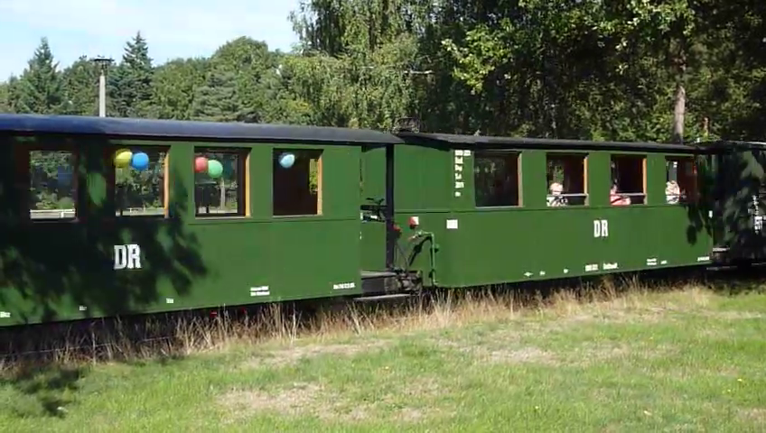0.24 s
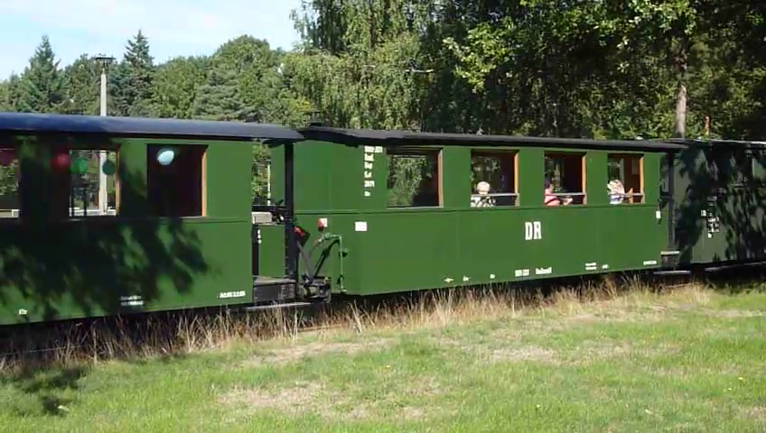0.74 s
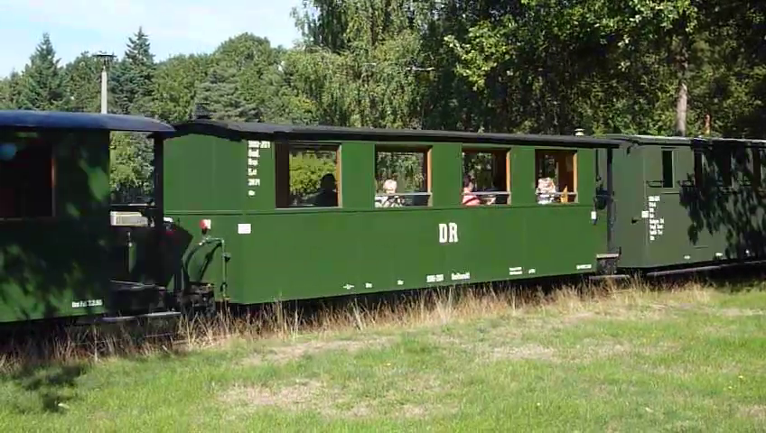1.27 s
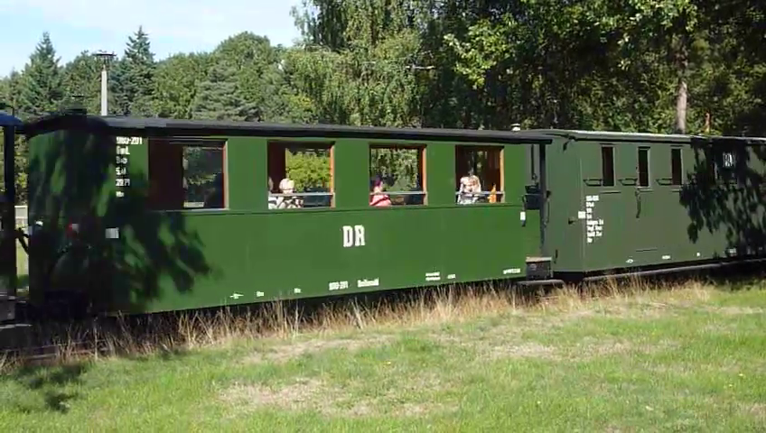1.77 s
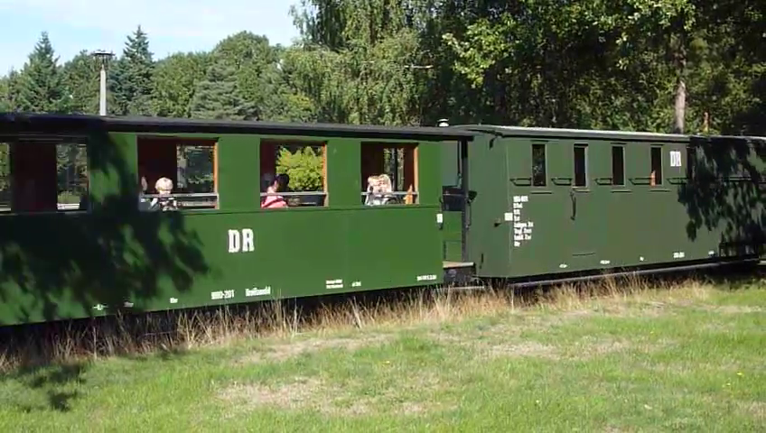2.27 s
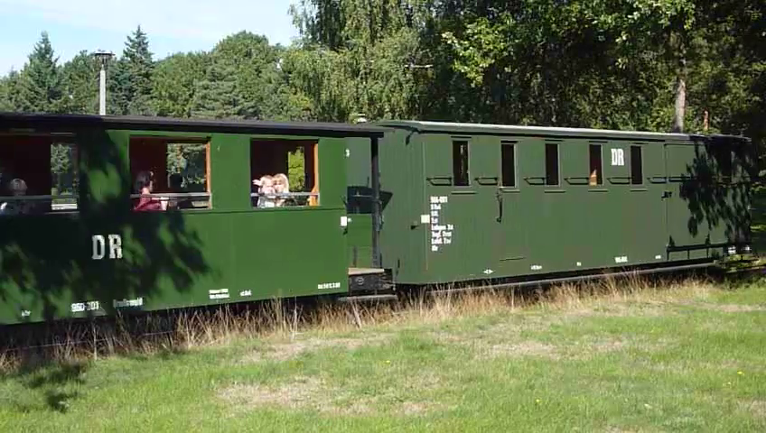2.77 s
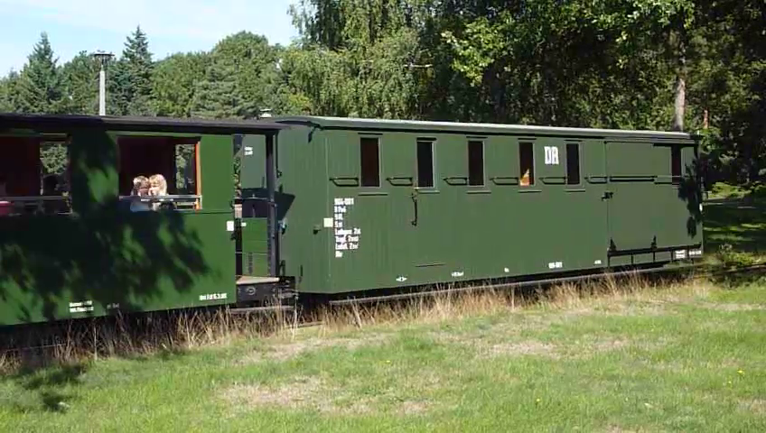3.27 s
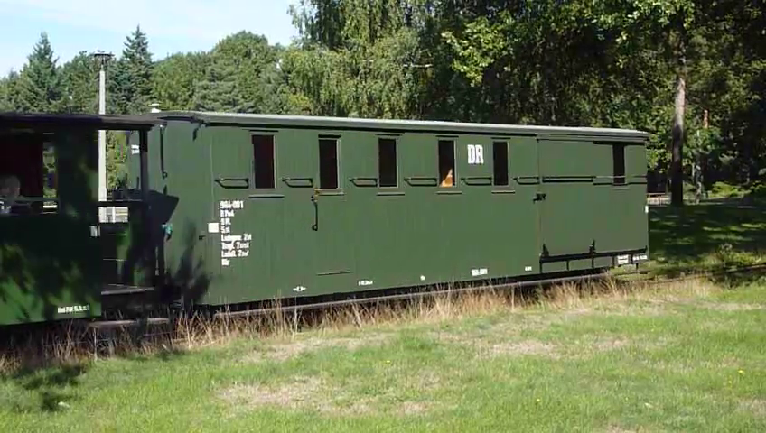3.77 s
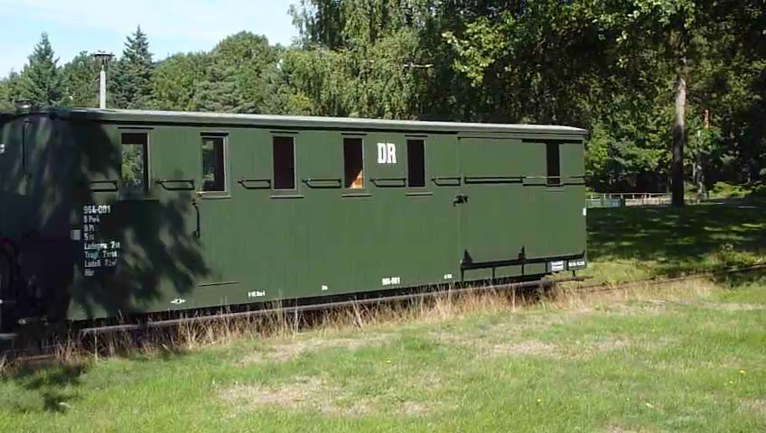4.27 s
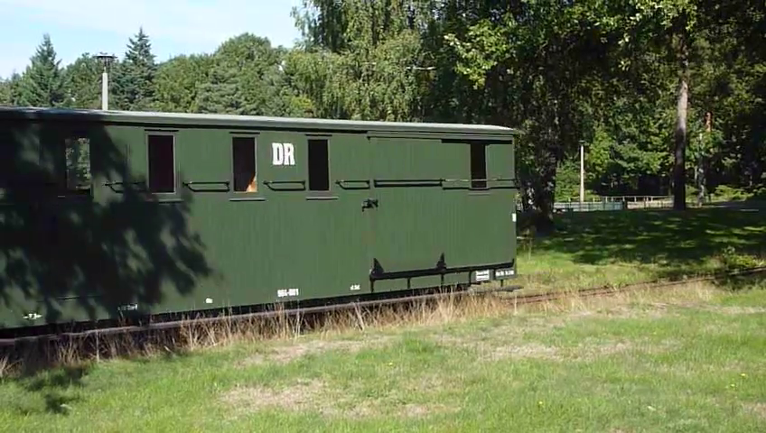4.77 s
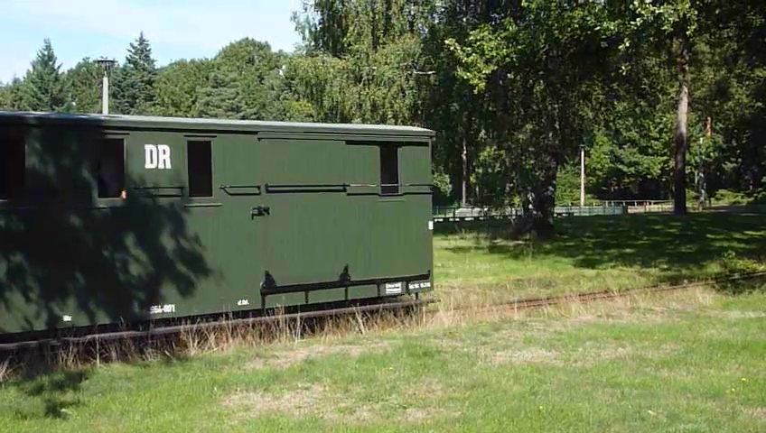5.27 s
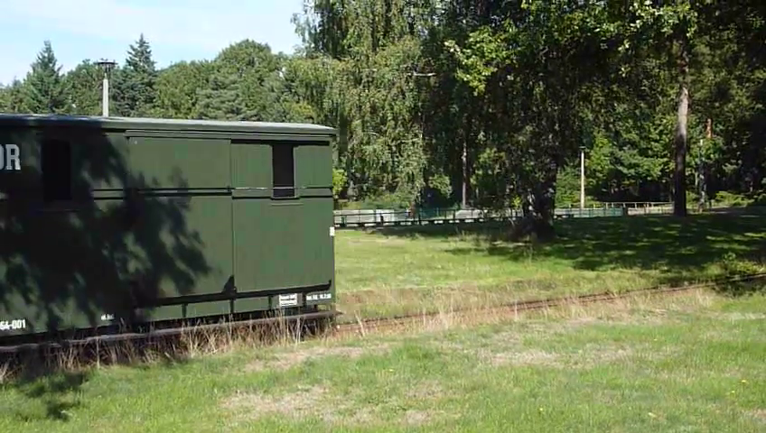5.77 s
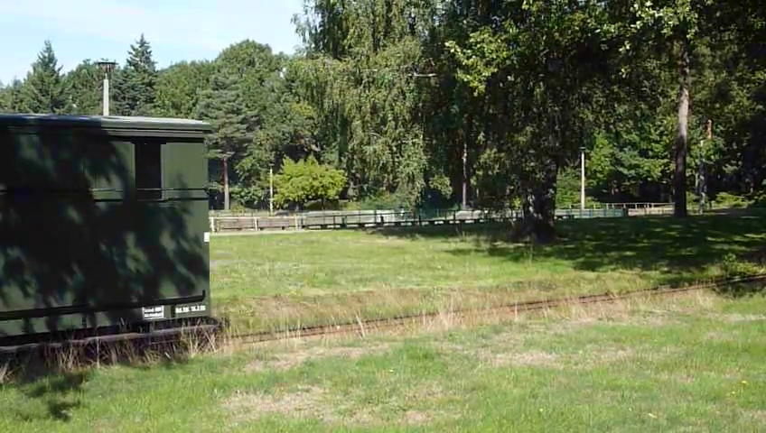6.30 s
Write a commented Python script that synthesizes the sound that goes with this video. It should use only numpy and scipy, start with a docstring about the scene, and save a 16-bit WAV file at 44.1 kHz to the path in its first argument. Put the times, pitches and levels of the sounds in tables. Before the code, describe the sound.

Coaches rumble by in a park while a long, steady horn blast sounds from the left, then stops, leaving rolling noise and sharp wheel clacks.

```python
"""Park train with horn

A small diesel train rolls through a park: coaches close by, locomotive off to the left.
The horn is a pipe blown by engine exhaust: one long, nearly pure note, fluttering with the firing.
Coloured noise rolls and hisses; damped modes ring joints, bogies and rattles; trees echo the horn."""
import sys
import numpy as np
from scipy import signal
from scipy.fft import rfft, irfft, next_fast_len
from scipy.io import wavfile
from scipy.ndimage import map_coordinates

SR = 44100
rng = np.random.default_rng(int(sys.argv[2]) if len(sys.argv) > 2 else 0)


def put_to_file(sound):
    """Save the sound as 16-bit audio at rate SR, in the file named by the first command-line argument."""
    columns = np.atleast_2d(sound).T  # one column per channel
    safe = np.clip(columns, -1, 1)
    whole_steps = np.round(safe * 32767)
    wavfile.write(sys.argv[1], SR, whole_steps.astype(np.int16))


N = 288395


def amp(db):
    """Decibels to gain."""
    return 10 ** (np.asarray(db) / 20)


def unit(x):
    """Scaled to rms 1."""
    return x / np.sqrt(np.mean(x ** 2) + 1e-20)


def along(points, hz):
    """(f/Hz, value) points, interpolated on a log frequency axis."""
    f, v = np.transpose(points)
    return np.interp(np.log(hz + 1), np.log(f + 1), v)


def curves(rows):
    """One value per sample for each column after the time."""
    s, *cols = np.transpose(rows)
    return [np.interp(np.arange(N) / SR, s, c) for c in cols]


def ramp(start_s, length_s):
    """Rises from 0 to 1 over length_s."""
    return np.clip((np.arange(N) / SR - start_s) / length_s, 0, 1)


def wobble(rate_hz):
    """Smooth random curve, rate_hz knots a second."""
    knots = rng.standard_normal(int(N * rate_hz / SR) + 4)
    return map_coordinates(knots, [np.arange(N) * rate_hz / SR])


def wander(t, step_rad):
    """Random walk of phase, which roughens a ring."""
    return step_rad * np.cumsum(rng.standard_normal(len(t)))


def held(t, length_s):
    """Stays near 1 for about length_s, then falls away."""
    return 1 / (1 + (t / length_s) ** 6)


def filtered(x, response):
    """x times a response of frequency."""
    size = next_fast_len(N + SR)
    return irfft(rfft(x, size) * response(np.fft.rfftfreq(size, 1 / SR)), size)[..., :N]


def add(track, s, sound):
    """Mixes a sound in at time s."""
    start = round(s * SR)
    track[..., start:start + sound.shape[-1]] += sound[..., :N - start]


def resonance(f, centre_hz, width_hz):
    """Power response of one resonance, 1 at its centre."""
    damping = (f * width_hz) ** 2
    return damping / ((centre_hz ** 2 - f * f) ** 2 + damping)


def colour(spectrum, peaks=()):
    """Gain of a broad spectrum with resonances standing on it."""
    def gain(f):
        ringing = sum(amp(db) ** 2 * resonance(f, c, w) for c, w, db in peaks)
        return np.sqrt(amp(along(spectrum, f)) ** 2 + ringing)
    return gain


# left-right likeness of noise: f/Hz, correlation [-1..1]
LIKENESS = [(50, .93), (200, 1), (600, 1), (1200, 1), (2200, 0.84), (4000, 0.57), (8000, 0.18)]


def rush(gain, drive=1, ripple_db=2.5, ripple_hz=70):
    """Stereo noise of rms 1, pulsed by drive, coloured and finely rippled; bass alike on both sides."""
    def response(hz):
        bumps = map_coordinates(rng.standard_normal(int(SR / ripple_hz)), [hz / ripple_hz])
        ripple = amp(ripple_db * np.clip(hz / 2000, 0, 1) * bumps)
        turn = np.arccos(np.clip(along(LIKENESS, hz), -1, 1)) / 2
        return gain(hz) * ripple * np.array([np.cos(turn), np.sin(turn)])
    mid, side = filtered(drive * rng.standard_normal((2, N)), response)
    return unit(np.array([mid + side, mid - side]))


# tree-line echoes: delay/s, level/dB
TREE_ECHOES = [(.1811, -21.5), (.2129, -19), (.4, -34.5), (.72, -30)]
# diffuse tail, before wet_db; re direct sound, whose overtones the coaches screen:
# f/Hz, t60/s, level/dB
TREE_TAIL = [(200, 1.8, -4), (546, 3.6, -2), (1580, 1.8, 8), (2200, 1, 13), (3000, 0.7, 12.5),
             (8000, 0.63, 5)]
BUILD_S = 0.3  # the tail gathers slowly, from ever farther trees


def trees(x, wet_db=-17.5):
    """Soft discrete echoes from the tree line plus a long thin tail of decaying noise."""
    band_hz, band_t60, band_db = np.transpose(TREE_TAIL)
    hz, t, noise = signal.stft(rng.standard_normal(SR * 3 // 2), SR, nperseg=256)
    t60 = np.interp(hz, band_hz, band_t60)[:, None]
    level_db = np.interp(hz, band_hz, band_db)[:, None]
    envelope = np.minimum(t / BUILD_S, 1) * amp(level_db - 60 * t / t60)
    decay_norm = np.sqrt(t60 * SR / np.log(1e6))
    tail = signal.istft(noise * envelope / decay_norm, SR, nperseg=256)[1]
    diffuse = signal.fftconvolve(x, tail[None], axes=1)[:, :N]

    def delays(f):
        return sum(amp(db) * np.exp(-2j * np.pi * f * delay) for delay, db in TREE_ECHOES)
    return filtered(x, delays) + amp(wet_db) * diffuse


FIRING_HZ, FIRST_PUFF_S = 55.34, 1.153  # first strong puff into the horn
PUFF_SCATTER = 0.17


def exhaust_pressure(uneven=0.53, firing=0.56, sharpness=0.19, skew_rad=0.69):
    """One puff per firing; every second puff is stronger, and no two are quite equal."""
    t = np.arange(N) / SR
    turn = 2 * np.pi * FIRING_HZ * (t - FIRST_PUFF_S + 0.0005 * wobble(4))
    puffs = uneven * np.cos(turn / 2 + skew_rad) + firing * np.sin(turn) + sharpness * np.cos(3 * turn / 2)
    return puffs * (1 + PUFF_SCATTER * wobble(40))


# exhaust noise spectrum, relative: f/Hz, level/dB [per Hz]
ENGINE_SPECTRUM = [(25, -73.5), (50, -42), (120, -17.5), (230, -7), (420, -9.5), (650, -11.5),
                   (1100, -24.5), (1900, -8), (3000, -29), (4300, -27), (7000, -26), (9000, -55.5)]
# exhaust resonances, relative: f/Hz, width/Hz, level/dB
EXHAUST_MODES = [(275, 27, -3.5), (728, 52, -1), (903, 38, -4.5), (1601, 125, -0.5), (3070, 260, -13.5),
                 (3950, 350, -16.5)]
# firing orders picked out by the stack, relative: multiple of firing rate, level/dB
HUM_ORDERS = [(13.5, -11.5), (15, -11), (28.5, -24)]
# exhaust boom, strongest low order: t/s, level/dB
BOOM_CURVE = [(0, -44.5), (.7, -46), (.9, -40), (1.3, -42), (1.5, -51.5), (2.2, -58.5), (4, -66)]
BOOM_ORDER, BOOM_WAVER_DB, BOOM_DRIFT_RAD = 5, 4, 0.7
ENGINE_DB, RECEDE_S, RECEDE_DB_PER_S, FAR_ENGINE_DB = -33, 1.08, 9.5, -47.5


def engine(pressure, puffing=0.2, waver_db=0.94, hum_waver_db=3, hum_drift_rad=0.22, lumps_db=2.0):
    """Exhaust puffs boom and ring the stack; the sound fades as the locomotive draws away."""
    t = np.arange(N) / SR
    receding_db = ENGINE_DB - RECEDE_DB_PER_S * np.maximum(t - RECEDE_S, 0)
    level_db = np.maximum(receding_db, FAR_ENGINE_DB)
    firing = 2 * np.pi * FIRING_HZ * t
    boom_db, = curves(BOOM_CURVE)
    boom_gain = np.sqrt(2) * amp(boom_db + BOOM_WAVER_DB * wobble(16))
    boom = boom_gain * np.sin(BOOM_ORDER * firing + BOOM_DRIFT_RAD * wobble(14))
    hum = np.zeros(N)
    for order, db in HUM_ORDERS:
        gain = amp(db + hum_waver_db * wobble(7.4))
        drift = hum_drift_rad * np.sqrt(order) * wobble(14)
        hum += gain * np.sin(round(2 * order) / 2 * firing + drift)
    pulses = np.abs(1 + puffing * pressure) * amp(lumps_db * wobble(50))
    noise = rush(colour(ENGINE_SPECTRUM, EXHAUST_MODES), pulses)
    return boom + amp(level_db + waver_db * wobble(12)) * (hum + noise)


# rolling noise spectrum, relative: f/Hz, level/dB [per Hz]
ROLLING_SPECTRUM = [(25, -63.5), (55, -32), (75, -27), (230, -4.5), (514, -4), (554, -1), (596, -0.5),
                    (742, 0), (1100, -6.5), (1540, -11.5), (1780, -13.5), (2910, -19), (5350, -27),
                    (6340, -28.5), (8500, -47), (11000, -90.5), (18700, -120)]
# wheel resonances rung by rolling, relative: f/Hz, width/Hz, level/dB
STEEL_MODES = [(390, 31, -10), (820, 70, -12), (875, 26, -4.5), (1580, 49, -5.5), (2920, 90, -19.5)]
# rolling wheels, before ROLL_TRIM_DB: t/s, level/dB
ROLL_CURVE = [(0, -34), (0.4, -33), (1.1, -34.5), (2.0, -40), (3.1, -41), (4.1, -38.5), (4.6, -35.5),
              (6.54, -38)]
ROLL_TRIM_DB = 1.5


def rolling(waver_db=0.84, grit_db=0.5):
    """Rough wheels on rough rails: coloured noise with a faint ring of steel."""
    level_db, = curves(ROLL_CURVE)
    roar = rush(colour(ROLLING_SPECTRUM, STEEL_MODES), amp(grit_db * wobble(150)))
    return amp(ROLL_TRIM_DB + level_db + waver_db * wobble(9)) * roar


# light coach rattles: t/s, level/dB, ring f/Hz
RATTLE_TICKS = [(.535, -38, 4220), (.826, -38, 6840), (0.905, -33.5, 3580), (1.378, -37.5, 6060),
                (1.895, -34, 3910), (2.14, -36.5, 4200), (2.219, -38, 2780), (2.632, -36.5, 4470),
                (3.222, -35.5, 3240), (3.464, -36, 3700)]


def rattles(ring_db=-2):
    """Loose couplings and fittings tick: a noise burst plus one rough, damped mode."""
    t = np.arange(SR // 8) / SR
    ticks, ring = np.zeros(N), np.zeros(N)
    for s, db, hz in RATTLE_TICKS:
        fade = amp(db - 60 * t / 0.085) * (1 - np.exp(-t / 0.001))
        add(ticks, s, fade)
        add(ring, s, amp(ring_db) * fade * np.sin(2 * np.pi * hz * t + wander(t, 0.048)))
    tick_gain = colour([(60, -36), (300, -31.0), (2000, 4), (4000, -4), (8000, -12.0)])
    return ticks * rush(tick_gain) + ring


# flange squeaks as wheels land: t/s, level/dB, start f/Hz, sag/(Hz per s), length/s
FLANGE_SQUEAKS = [(4.29, -39, 7100, 6990, 0.042), (6.296, -45, 7300, 3000, .018),
                  (6.322, -41, 4367, 5000, 0.028)]


def squeaks(t60_s=0.26, rough_rad=0.11):
    """A flange rubs the rail: a short, rough note that sags in pitch."""
    t = np.arange(SR // 6) / SR
    out = np.zeros(N)
    for s, db, hz, sag, length_s in FLANGE_SQUEAKS:
        note = np.sin(2 * np.pi * (hz - sag * t / 2) * t + wander(t, rough_rad))
        envelope = amp(db - 60 * t / t60_s) * (1 - np.exp(-t / 0.001)) * held(t, length_s)
        add(out, s, envelope * note)
    return out


# bogie frame modes, relative: f/Hz [nominal], level/dB, t60/s
BOGIE_MODES = [(341, -3.5, .07), (750, 1, 0.057), (1153, -7, .05)]
# bogies drop and rock: t/s, level/dB
BOGIE_KNOCKS = [(4.277, -23.5), (4.525, -24), (5.98, -29.5), (6.058, -29), (6.074, -29.5), (6.311, -25),
                (6.356, -28.5), (6.43, -30.5)]


def knocks(rise_s=0.0012, rough_rad=0.03):
    """A bogie drops on its springs and its frame sounds a short, dull note."""
    t = np.arange(SR // 8) / SR
    out = np.zeros(N)
    for s, db in BOGIE_KNOCKS:
        for hz, mode_db, t60 in BOGIE_MODES:
            mode_hz = hz * (1 + 0.038 * rng.standard_normal())
            envelope = amp(db + mode_db - 60 * t / t60) * (1 - np.exp(-t / rise_s))
            add(out, s, envelope * np.sin(2 * np.pi * mode_hz * t + wander(t, rough_rad)))
    return out


# wheels striking a rail joint, two to a bogie:
# t/s, level/dB, ring/dB [re blow], chatter/s, brightness/(dB per octave)
JOINT_BLOWS = [(0.765, -32, -22, 0.021, -0.7), (1.011, -31, -24, 0.025, -0.5), (4.273, -33, -9, 0.026, -1),
               (4.522, -32.5, -14, .021, -0.5), (6.054, -33, -16, .022, 0), (6.302, -30, -17, 0.02, 0.5)]
# clack noise spectrum, relative: f/Hz, level/dB [per Hz]
CLACK_SPECTRUM = [(40, -49), (120, -25), (300, 4.5), (750, 5.5), (1200, 3), (1800, -2.5), (3300, -2),
                  (4500, -7.5), (6000, -9.5), (7200, -12), (9000, -33)]
# struck-rail resonances, relative: f/Hz, width/Hz, level/dB
RAIL_MODES = [(2450, 110, 2), (3060, 96, 0.5), (3600, 70, -3), (4560, 70, -9.5)]
# wheel modes, relative: f/Hz [nominal], level/dB, t60/s
WHEEL_MODES = [(810, 1, 0.15), (1210, -6, .12), (1630, 1, .1), (2360, 0.5, 0.14), (3000, 5.5, 0.23),
               (3650, -3, .3), (4080, -1.5, 0.32), (4730, -9, 0.19)]


def joints(rise_s=0.0012, chatter_db=1.4, tail_db=-11, tail_t60_s=0.49, body_ripple_db=2):
    """Each wheel chatters across the gap for a moment, shaking its bogie, then rings."""
    t = np.arange(SR // 3) / SR
    attack = 1 - np.exp(-t / rise_s)
    tail = amp(tail_db - 60 * t / tail_t60_s)
    out = np.zeros((2, N))
    for s, db, ring_db, chatter_s, tilt_db in JOINT_BLOWS:
        scrape = np.zeros(N)
        add(scrape, s, amp(db) * attack * (held(t, chatter_s) + tail))

        def body(hz):
            return colour(CLACK_SPECTRUM, RAIL_MODES)(hz) * amp(tilt_db * np.log2((hz + 1) / 1000))
        noise = rush(body, ripple_db=body_ripple_db, ripple_hz=110.2)
        out += scrape * amp(chatter_db * wobble(500)) * noise
        # the loaded wheel never rings twice at quite the same pitch
        for hz, mode_db, t60 in WHEEL_MODES:
            scatter_db = 2 * rng.standard_normal((2, 1))
            size = amp(db + ring_db + mode_db + scatter_db - 60 * t / t60)
            mode_hz = hz * (1 + 0.004 * rng.standard_normal())
            ring = np.sin(2 * np.pi * mode_hz * t + wander(t, 0.06))
            add(out, s + chatter_s / 2, attack * size * ring)
    return out


# horn pitch, rising with blowing pressure: t/s, f/Hz
PITCH_CURVE = [(1.15, 537), (1.3, 537.3), (1.65, 541.7), (2.35, 551.8), (3.05, 554.8), (3.5, 543),
               (3.82, 545.6), (3.93, 559), (3.99, 561.5), (4.05, 549)]
# horn loudness, before the valve: t/s, level/dB
LOUDNESS_CURVE = [(1.15, -20.5), (1.22, -18), (1.43, -15), (1.74, -14.5), (1.81, -16.5), (1.87, -14),
                  (2.1, -13), (2.46, -14), (2.53, -18.5), (2.58, -15), (2.625, -23.5), (2.68, -13.5),
                  (2.95, -13), (3.12, -17), (3.37, -14), (3.43, -21.5), (3.58, -17), (3.7, -19),
                  (3.87, -12.5), (3.97, -12.5), (4.0, -15.5), (4.04, -15)]
# overtones swell and fade separately; before OVERTONE_TRIM_DB and UNSETTLED_DB:
# t/s, second level/dB, third level/dB, fourth level/dB
OVERTONE_CURVES = [(1.4, -41.5, -47.5, -45.5), (1.8, -41, -37, -45), (1.92, -41.5, -35.5, -43),
                   (1.95, -42, -45.5, -46), (1.99, -34.5, -34.5, -40.5), (2.11, -40, -34, -43),
                   (2.14, -37.5, -51.5, -43), (2.25, -46, -34, -41), (2.32, -39, -33.5, -41.5),
                   (2.42, -39.5, -40, -39), (2.53, -34.5, -31, -34), (2.62, -39, -30.5, -43),
                   (2.72, -38.5, -40.5, -38.5), (2.84, -47, -36, -53), (2.9, -48, -43, -46.5),
                   (3.0, -47, -42, -45), (3.14, -38.5, -44, -48.5), (3.3, -46, -38.5, -43.5),
                   (3.8, -49.5, -40, -50.5), (3.93, -45, -33.5, -39.5), (4.03, -40.5, -32.5, -41.5)]
OPEN_S, ATTACK_S, CLOSE_S, RELEASE_S = 1.128, 0.016, 4.05, 0.02  # valve
# gas seeps in first: a weak, flat note
LEAK_S, LEAK_LENGTH_S, LEAK_DB, LEAK_FLAT_HZ = 0.787, 0.28, -8.5, 10
NOMINAL_HZ = 550
START_FLUTTER, SETTLE_S = 0.73, 0.5  # the note stutters at first, then settles
FLUTTER, FLUTTER_DB_PER_HZ = 0.17, -0.28  # settled depth at nominal pitch; harder blowing steadies it
OVERTONE_TRIM_DB, UNSETTLED_DB = -1, -7  # overtones need a settled note
# hiss grows with pressure and overtones, and outlasts the note a little
HISS_DB, HISS_DB_PER_HZ, HISS_FOLLOWS, HISS_FALL_DB_PER_S = -41, 0.37, 0.34, 110


def blowing():
    """The valve opens and the note settles; more pressure makes it sharper, steadier and hissier."""
    t = np.arange(N) / SR
    (pitch_hz,), (level_db,) = curves(PITCH_CURVE), curves(LOUDNESS_CURVE)
    bright_db = np.mean(curves(OVERTONE_CURVES), axis=0)
    opened = ramp(OPEN_S, ATTACK_S)
    valve = opened * (1 - ramp(CLOSE_S, RELEASE_S))
    leak_end = 1 - ramp(LEAK_S + LEAK_LENGTH_S - RELEASE_S, RELEASE_S)
    leak = amp(LEAK_DB) * ramp(LEAK_S, LEAK_LENGTH_S) * leak_end
    unsettled = np.exp(-(np.maximum(t - OPEN_S, 0) / SETTLE_S) ** 2)
    push_hz = pitch_hz - NOMINAL_HZ
    flutter = START_FLUTTER * unsettled + FLUTTER * amp(FLUTTER_DB_PER_HZ * push_hz)
    loudness = amp(level_db) * (valve + leak)
    overtone_gain = amp(OVERTONE_TRIM_DB + UNSETTLED_DB * unsettled) * valve
    hiss_db = HISS_DB + HISS_DB_PER_HZ * push_hz + HISS_FOLLOWS * (bright_db - bright_db.mean())
    hiss_gain = opened * amp(hiss_db - HISS_FALL_DB_PER_S * np.maximum(t - CLOSE_S, 0))
    return pitch_hz - LEAK_FLAT_HZ * (1 - opened), flutter, loudness, overtone_gain, hiss_gain


# high overtones: multiple of pitch, level/dB [re fourth]
HIGH_PARTIALS = [(5, -10), (6, -13.5), (7, -19.5)]
# pipe resonances in the hiss, relative: f/Hz, width/Hz, level/dB
PIPE_MODES = [(550, 48, -1), (1614, 67, 10), (2070, 200, -2), (2750, 180, -0.5), (3970, 430, -2.5)]
# jet noise spectrum, relative: f/Hz, level/dB [per Hz]
JET_SPECTRUM = [(200, -36.5), (600, -11.5), (2500, -17.5), (4500, -12.5), (6800, -12.5), (9000, -38.5)]
OVERTONE_FADING_DB, OVERTONE_SMEAR_RAD = 1.5, 0.085


def horn(pressure, bend_hz=4.2, surge_hz=12, jitter_hz=2, shimmer_db=0.51, sway_db=0.55,
         rough_db=1.23, scatter_rad=0.23, chirp_db=-12.0, chirp_uneven_db=3, puffing=0.094, saturation=0.62):
    """The puffs shake the pipe's level and pitch; the jet at its lip hisses through the same pipe."""
    pitch_hz, flutter, loudness, overtone_gain, hiss_gain = blowing()
    shake = flutter * pressure
    # the front of each puff pushes the note sharp
    surge = np.gradient(shake) * SR / (2 * np.pi * FIRING_HZ)
    # the pipe cannot swell as far as it can sink
    shake = shake / (1 + saturation * np.maximum(shake, 0))
    shaken_hz = pitch_hz + bend_hz * pressure + surge_hz * surge + jitter_hz * wobble(90)
    phase = 2 * np.pi * np.cumsum(shaken_hz) / SR
    unsteady = amp(shimmer_db * wobble(60) + sway_db * wobble(21.92))
    note = loudness * unsteady * np.abs(1 + shake) * np.sin(phase)

    second, third, fourth = curves(OVERTONE_CURVES)
    levels = [(2, second), (3, third), (4, fourth)]
    levels += [(k, fourth + db) for k, db in HIGH_PARTIALS]
    overtones = np.zeros((2, N))
    for k, db in levels:
        gain = amp(db + OVERTONE_FADING_DB * wobble(18) + rough_db * (wobble(80) + pressure))
        # moving coaches scatter the overtones, higher ones more, differently for each side
        smear = k * OVERTONE_SMEAR_RAD * np.array([wobble(60), wobble(60)])
        drift = smear + scatter_rad * wobble(60) + wobble(6.6)
        overtones += gain * np.sin(round(k) * phase + drift)

    # crests of the stronger puffs overblow the pipe to its fifth partial, mostly while unsettled
    overblown = np.sin(5 * phase + wobble(40))
    crests = np.maximum(shake, 0) ** 2 * (loudness / loudness.max()) ** 3
    chirps = amp(chirp_db + chirp_uneven_db * wobble(40)) * crests * overblown
    hiss = rush(colour(JET_SPECTRUM, PIPE_MODES), np.abs(1 + puffing * pressure))
    return np.sqrt(2) * (note + chirps + overtone_gain * (1 + shake) * overtones) + hiss_gain * hiss


# stereo balance: f/Hz, left minus right level/dB
LEFT_BALANCE = [(60, 0), (300, 1), (550, 1.5), (920, 3), (1600, 6), (2700, 8), (4700, 8), (8200, 7.5)]


def scene(lead_s=0.00004):
    """All sources lie to the left, so the right side is a little late and shaded in the treble."""
    pressure = exhaust_pressure()
    blast = horn(pressure)
    train = engine(pressure) + rolling() + rattles() + squeaks() + knocks() + joints()
    mix = trees(blast) + train + blast
    sides = np.array([[0.5], [-0.5]])

    def placement(hz):
        return amp(sides * along(LEFT_BALANCE, hz)) * np.exp(2j * np.pi * hz * lead_s * sides)
    return filtered(mix, placement)


def record(dry, low_cut_hz=36, notch_hz=5440, width_hz=190, top_hz=7900):
    """The microphone chain drops the deepest bass, one narrow treble notch and all above top_hz."""
    def response(hz):
        high_pass = hz ** 2 / np.hypot(hz ** 2, low_cut_hz ** 2)
        notch = np.abs(hz - notch_hz) / np.hypot(hz - notch_hz, width_hz)
        low_pass = 1 / np.sqrt(1 + (hz / top_hz) ** 64)
        return high_pass * notch * low_pass
    return filtered(dry, response)


dry = scene()
out = record(dry)
put_to_file(out)
```